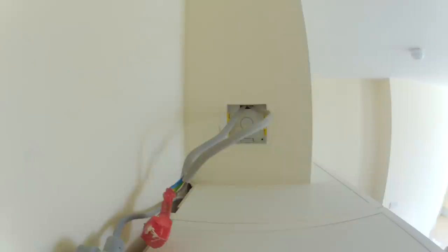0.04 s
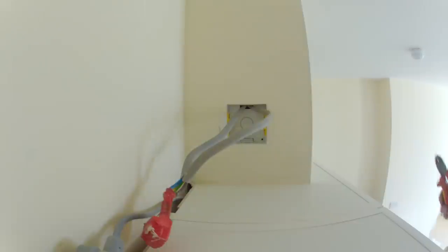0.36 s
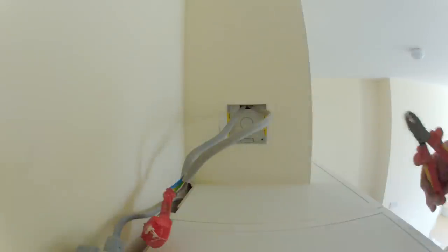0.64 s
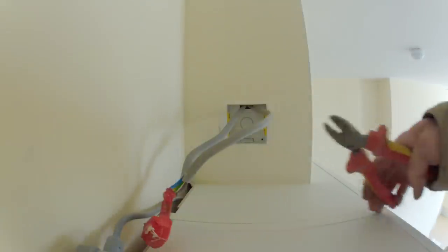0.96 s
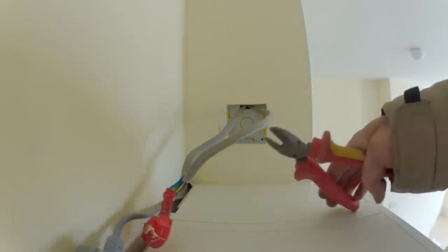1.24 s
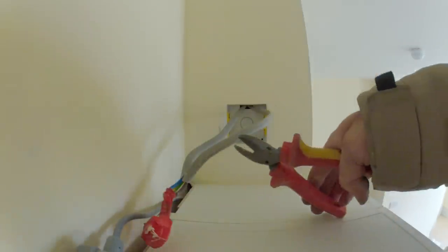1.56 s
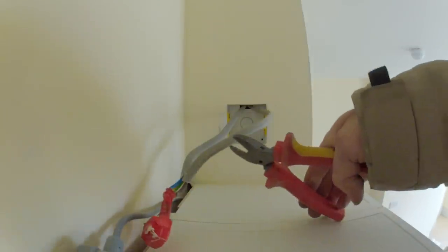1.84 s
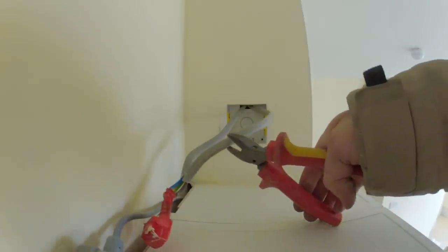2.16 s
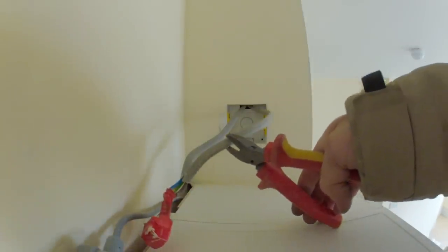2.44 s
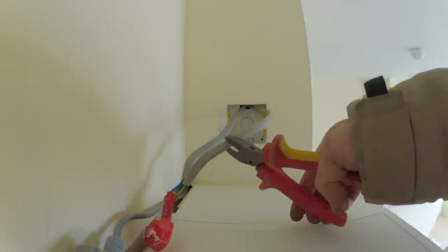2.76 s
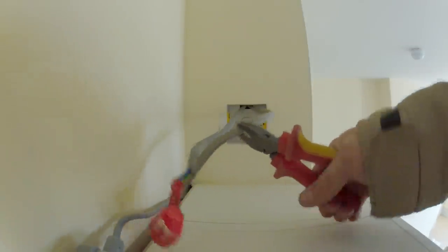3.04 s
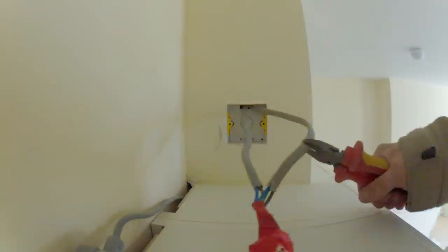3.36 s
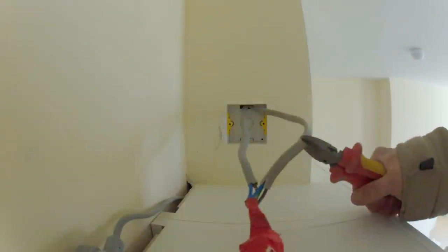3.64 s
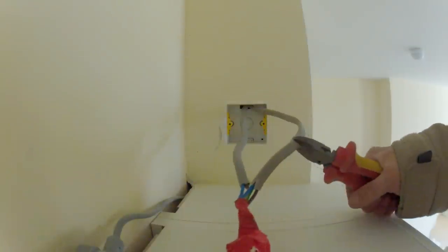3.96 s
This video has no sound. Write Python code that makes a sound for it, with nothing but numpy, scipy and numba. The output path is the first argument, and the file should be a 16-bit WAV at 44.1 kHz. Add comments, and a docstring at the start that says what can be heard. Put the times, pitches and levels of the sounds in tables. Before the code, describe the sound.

A loud electrical bang booms through a bare room as pliers bite a live cable, after faint sleeve rustling and small knocks. A second sharp crack follows half a second later, and the close microphone briefly overloads.

```python
"""A short circuit bangs as pliers cut a live cable at a wall socket in a bare room.
The microphone is close by, inside a small camera's plastic case. A sleeve rustles, the sheath creaks
and the jaws bite; the arc sets the room booming, and a second sharp crack follows.
The bang overloads the recorder, whose gain ducks and climbs back while the room rings out.
Knocks come through the case and mount, over quiet room tone and a low hum."""
import sys
import numpy as np
from scipy.fft import rfft, irfft, next_fast_len
from scipy.io import wavfile
from scipy.ndimage import minimum_filter1d, map_coordinates
from numba import njit

SR = 44100
rng = np.random.default_rng(int(sys.argv[2]) if len(sys.argv) > 2 else 0)


def wrap_up_sound(samples):
    """Save the sound to the file named by the first command line argument, as 16-bit audio."""
    columns = np.atleast_2d(samples).T
    # keep every value between -1 and 1, then stretch to whole-number steps
    tamed = np.clip(columns, -1, 1)
    steps = np.round(tamed * 32767).astype(np.int16)
    wavfile.write(sys.argv[1], SR, steps)


N = 176400
WALL_DELAY_S = 0.0034  # extra path by way of the near wall

# the arc at the socket, close to the microphone (frequency [Hz], relative level [dB])
ARC_SPECTRUM = [(40, 0), (150, 2), (450, 6), (900, 1), (1500, -7), (3200, -4), (5000, -6), (8000, -12),
                (11000, -26.5), (15000, -23)]
# the bare room's answer to the bang (frequency [Hz], relative level [dB])
BOOM_SPECTRUM = [(30, -28), (80, -21), (115, -2), (200, 1.5), (420, -5), (560, -18.5), (750, -32),
                 (1100, -24), (1500, -32.5), (2000, -32.5), (2400, -36), (3100, -30), (3800, -35),
                 (5000, -38.5), (8500, -40.5), (10500, -48), (12000, -38), (13800, -55), (15000, -44)]
# standing waves between the walls (frequency [Hz], level [dB], t60 [s])
STANDING_WAVES = [(127, -4.5, 1.01), (169, -5, 0.99), (241.3, -6.5, 0.93), (281, -6, 0.92),
                  (387.6, -10.5, 1.13)]


def bang(start=3.1991, push_hz=164.5, push_s=0.0091):
    """The arc cracks, shoves the air and sets the whole room booming."""
    t = clock(start)
    push_window = np.sin(np.pi * np.minimum(t / push_s, 1))
    push = -amp(15) * np.sin(2 * np.pi * push_hz * t) * push_window
    arc = amp(1) * noise(ARC_SPECTRUM) * strike(start, rise=0.0009, t60=0.068, hold=0.0081)
    room_start, room_rise = start + WALL_DELAY_S, 0.0079
    boom = amp(2) * noise(BOOM_SPECTRUM) * strike(room_start, room_rise, t60=0.93)
    modes = sum(amp(db) * ring(room_start, hz, room_rise, t60) * amp(2.3 * wobble(14))
                for hz, db, t60 in STANDING_WAVES)
    return push + arc + boom + modes


# the second crack, direct to the microphone (frequency [Hz], relative level [dB])
CRACK_SPECTRUM = [(50, 5), (250, 2), (550, 4), (1100, -1.5), (1500, -1), (2000, 2), (2600, -3), (4000, 1),
                  (5000, -3), (6000, 4.5), (9000, -9), (11500, -23), (15000, -12)]
# its echo from farther off in the room (frequency [Hz], relative level [dB])
ECHO_SPECTRUM = [(30, -17), (62, 3), (100, -5.5), (250, -4), (430, 5), (600, -6), (850, -20), (1400, -19.5),
                 (2000, -16), (2600, -17), (4500, -12.5), (8000, -18.5), (10000, -30.5), (12000, -36),
                 (13500, -34), (15000, -35)]


def crack(start=3.6739):
    """A bright crack and a thump; the near wall slaps back, then the room echoes."""
    snap = amp(-8.5) * noise(CRACK_SPECTRUM) * strike(start, rise=0.0004, t60=0.034, hold=0.0048)
    slap = amp(-9) * np.interp(clock(WALL_DELAY_S), clock(), snap)
    thump = amp(-1.5) * ring(start + 0.0029, hz=488, rise=0.0017, t60=0.03)
    early = amp(-21) * strike(start, rise=0.0025, t60=0.12, hold=0.019)
    late = amp(-20.5) * strike(start, rise=0.047, t60=0.85)
    return snap + slap + thump + noise(ECHO_SPECTRUM) * (early + late)


# the sheath creaking in the jaws, close up (time [s], level [dB])
SHEATH_CREAKS = [(2.959, -47.5), (3.02, -48), (3.037, -48.5)]
# the jaws biting through sheath and copper (time [s], level [dB])
JAW_BITES = [(3.1561, -27), (3.176, -14), (3.1805, -11)]
# pliers and cable ringing (frequency [Hz], relative level [dB], t60 [s])
PLIER_MODES = [(296, -2, .035), (388, 7.5, .04), (524, -13, 0.049), (830, -9, 0.038), (1008, -5.5, 0.043)]
# the gritty tick of a bite, or of a knock on the case (frequency [Hz], relative level [dB])
TICK_SPECTRUM = [(300, 8.5), (1200, 7.5), (2500, -12), (5000, -27), (9000, -27), (12000, -4), (15500, -23)]


def pliers():
    """The sheath creaks, then the jaws give way in steps, each harder than the last."""
    grit = noise(TICK_SPECTRUM)
    creaks = sum(amp(db) * strike(start, rise=0.0005, t60=0.073) for start, db in SHEATH_CREAKS)
    out = noise(RUB_SPECTRUM) * creaks
    for start, db in JAW_BITES:
        body = sum(amp(mode_db) * ring(start, hz, rise=0.0008, t60=t60)
                   for hz, mode_db, t60 in PLIER_MODES)
        tick = amp(-15) * grit * strike(start, rise=0.00024, t60=0.059)
        out += amp(db) * (body + tick)
    return out


# knocks on the case and mount, right at the microphone (time [s], level [dB], pitch [Hz])
CASE_KNOCKS = [(.262, -35, 372), (1.011, -36, 410), (1.328, -42, 375), (1.358, -40.5, 256),
               (1.711, -35.5, 329), (2.46, -35.5, 360), (2.623, -41, 329), (3.397, -8, 450),
               (3.751, -8, 384), (3.968, -29.5, 386)]
# what a knock rings with (frequency [multiple of its pitch], relative level [dB])
KNOCK_PARTIALS = [(.74, -7), (1, 3), (1.5, -6.5), (2.2, -17.5)]


def knocks():
    """Dull knocks carry through the camera case, each with a faint tick."""
    out, grit = np.zeros(N), noise(TICK_SPECTRUM)
    for start, db, hz in CASE_KNOCKS:
        body = sum(amp(partial_db) * ring(start, hz * ratio, rise=0.004, t60=0.029)
                   for ratio, partial_db in KNOCK_PARTIALS)
        tick = amp(-22) * grit * strike(start, rise=0.0013, t60=0.057)
        out += amp(db) * (2 * body + tick)
    return out


# low resonances of cabinet and camera mount (time [s], level [dB], frequency [Hz], rise [s], t60 [s])
MOUNT_RESONANCES = [(.26, -50, 171.4, .004, 0.53), (.46, -47.5, 127, 0.022, 0.46),
                    (1.03, -40.5, 398, .02, 0.34), (1.345, -46, 214.3, 0.018, 0.5),
                    (2.62, -46.5, 98.2, .06, 1.6), (3.565, -23, 49.7, .015, .35),
                    (3.756, -22.5, 65.3, 0.014, .3)]


def mount():
    """The cabinet and camera mount hum briefly, stirred by the moving arm."""
    return sum(amp(db) * ring(start, hz, rise, t60) for start, db, hz, rise, t60 in MOUNT_RESONANCES)


# sleeve and hand moving near the microphone (time [s], level [dB])
SLEEVE_LEVELS = [(0, -64), (.42, -62), (.49, -53), (.54, -62), (.76, -62.5), (.85, -53), (.995, -54),
                 (1.02, -43), (1.06, -54), (1.3, -64.5), (1.6, -73.5), (2.94, -74.5), (2.99, -63),
                 (3.05, -55.5), (3.09, -60), (3.15, -50.5), (3.3, -59)]
# rubbing cloth, and the creaking sheath too (frequency [Hz], relative level [dB])
RUB_SPECTRUM = [(60, -7.5), (150, -1), (280, -2), (430, -1), (800, -9), (1400, -14), (2000, -15.5),
                (3000, -15), (4500, -18), (8000, -23), (11000, -31), (15000, -34)]
# one short scrape of the sleeve (frequency [Hz], relative level [dB])
SCRAPE_SPECTRUM = [(100, -6), (280, -9), (400, 6), (520, -7), (680, 1.5), (950, -12), (1700, -15.5),
                   (2500, -10.5), (4000, -28), (9000, -30), (15000, -33)]


def sleeve():
    """Cloth rubs unevenly as the arm reaches for the cable, and scrapes once."""
    scrape = amp(-47) * noise(SCRAPE_SPECTRUM) * strike(start=0.436, rise=0.031, t60=0.097, hold=0.063)
    rustle = noise(RUB_SPECTRUM) * level(SLEEVE_LEVELS)
    return (rustle + scrape) * amp(1.25 * wobble(70))


# the quiet of the room all around the microphone (frequency [Hz], relative level [dB])
ROOM_TONE_SPECTRUM = [(25, -6), (50, -9.5), (110, 3), (220, -3.5), (400, -8.5), (800, -24), (2000, -26.5),
                      (5000, -33.5), (8500, -37), (11000, -41), (13000, -50), (15500, -60)]
# a low hum in the background (time [s], level [dB])
HUM_LEVELS = [(0, -73), (.7, -62.5), (1, -56.5), (1.3, -57.5), (1.55, -61.5), (1.75, -53.5), (1.9, -59.5),
              (2.03, -50.5), (2.13, -64), (2.26, -53), (2.6, -63.5), (3, -63)]


def room_tone(hum_hz=46.6):
    """Steady dark noise and a low hum that wavers in pitch and level."""
    air = amp(-58.5) * noise(ROOM_TONE_SPECTRUM)
    phase = 2 * np.pi * hum_hz * clock() + 1.05 * wobble(5.7)
    return air + np.sqrt(2) * level(HUM_LEVELS) * np.sin(phase)


def amp(db):
    """Decibels to gain."""
    return 10 ** (np.asarray(db) / 20)


def clock(start=0):
    """Seconds since start, zero before it."""
    return np.maximum(np.arange(N) / SR - start, 0)


def level(rows):
    """Gain per sample from (time [s], level [dB]) points."""
    return amp(np.interp(clock(), *np.transpose(rows)))


def noise(points):
    """Noise of rms 1, shaped by (frequency [Hz], relative level [dB]) points."""
    hz, db = np.transpose(points)
    shape = amp(np.interp(np.log(np.fft.rfftfreq(N, 1 / SR) + 1), np.log(hz), db))
    x = irfft(rfft(rng.standard_normal(N)) * shape, N)
    return x / x.std()


def strike(start, rise, t60, hold=0):
    """Envelope that rises, holds, then falls 60 dB in t60; all times in seconds."""
    return (1 - np.exp(-clock(start) / rise)) * np.exp(-np.log(1000) * clock(start + hold) / t60)


def ring(start, hz, rise, t60):
    """One struck mode: a decaying sine."""
    return np.sin(2 * np.pi * hz * clock(start)) * strike(start, rise, t60)


def wobble(rate):
    """A smooth curve through rate random values a second."""
    return map_coordinates(rng.standard_normal(1000), [clock() * rate], mode="wrap")


def scene():
    """Everything that reaches the camera's one microphone."""
    return (room_tone() + sleeve() + knocks() + mount() + pliers() + bang() + crack())[None]


# dip and resonances of the case around the microphone (frequency [Hz], width [Hz], gain [dB])
CASE_BANDS = [(6010, 300, -12.5), (11620, 120, 10), (12130, 150, 11)]


def plastic_case(x):
    """The case colours the treble, as a causal, minimum-phase filter."""
    size = 2 * next_fast_len(N * 3 // 4)
    freqs = np.fft.rfftfreq(size, 1 / SR)
    gain = amp(sum(db * np.exp(-((freqs - hz) / width) ** 2) for hz, width, db in CASE_BANDS))
    cepstrum = irfft(np.log(gain))
    cepstrum[1:size // 2] *= 2
    cepstrum[size // 2 + 1:] = 0
    return irfft(rfft(x, size) * np.exp(rfft(cepstrum)))[:N]


@njit
def ducking(excess_db, attack_s, recover_db_per_s):
    """Gain reduction in dB: chases any excess quickly, lets go at a steady rate."""
    out, held = np.zeros(len(excess_db)), 0.0
    for i in range(len(excess_db)):
        if excess_db[i] > held:
            held += (excess_db[i] - held) / (attack_s * SR)
        else:
            held = max(held - recover_db_per_s / SR, 0.0)
        out[i] = held
    return out


def record(dry):
    """Through the case into the recorder, which ducks on peaks, clips and cuts the highest treble."""
    limit_db, peak_hold_s, ceiling, top_hz = -6.5, 0.005, 0.69, 15200
    mic = plastic_case(dry[0])
    half_hold = int(peak_hold_s * SR / 2)
    peak = -minimum_filter1d(-np.abs(mic), size=2 * half_hold + 1, origin=half_hold)
    excess_db = 20 * np.log10(peak + 1e-9) - limit_db
    duck_db = ducking(excess_db, attack_s=0.0043, recover_db_per_s=64)
    clipped = np.clip(mic * amp(-duck_db), -ceiling, ceiling)
    size = next_fast_len(N + SR // 2)
    passband = np.fft.rfftfreq(size, 1 / SR) < top_hz
    return irfft(rfft(clipped, size) * passband, size)[None, :N]


dry = scene()
out = record(dry)
wrap_up_sound(out)
```